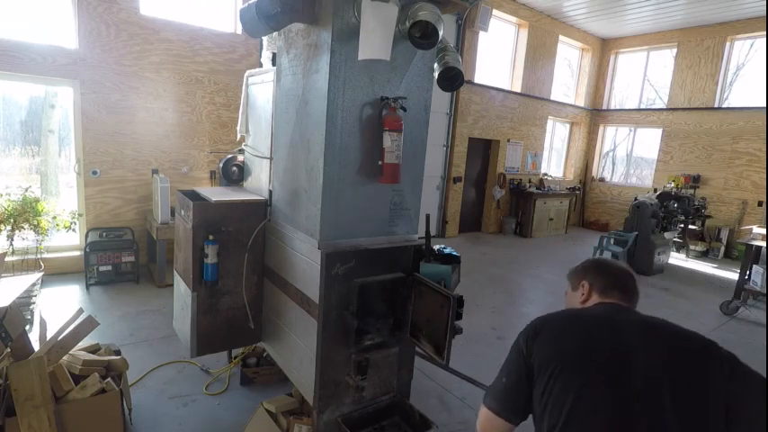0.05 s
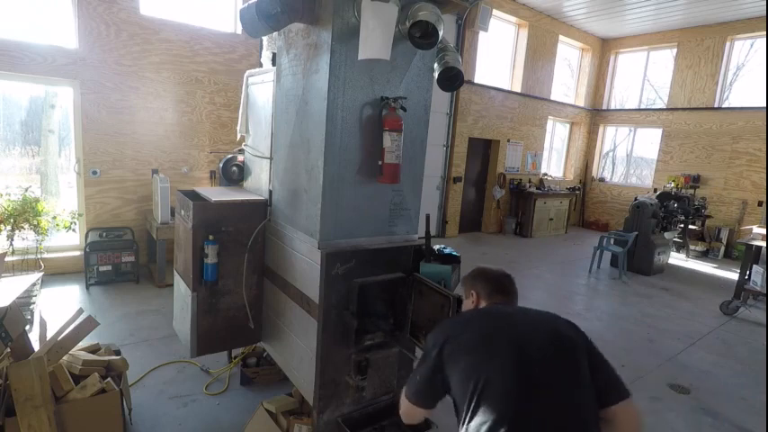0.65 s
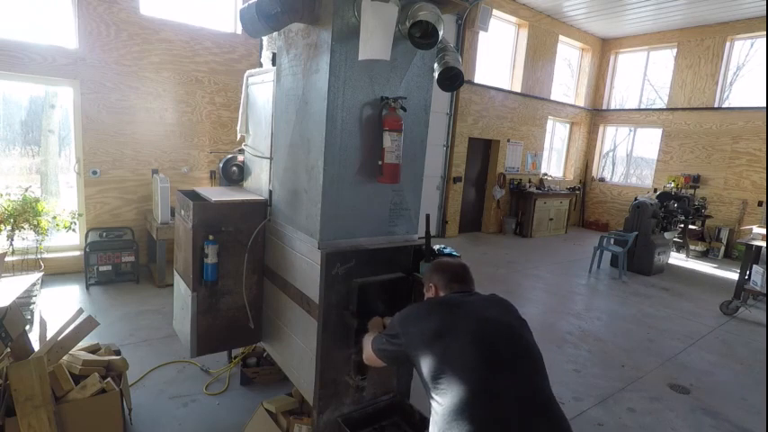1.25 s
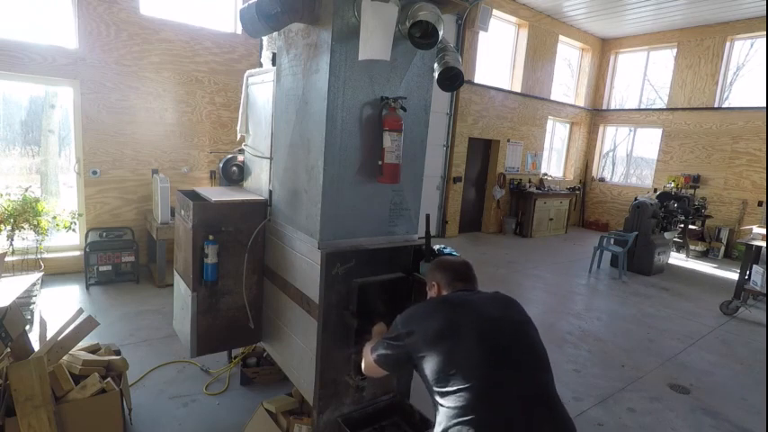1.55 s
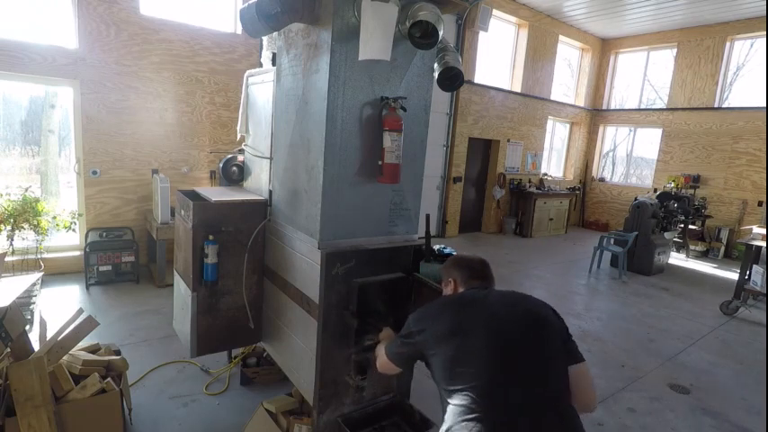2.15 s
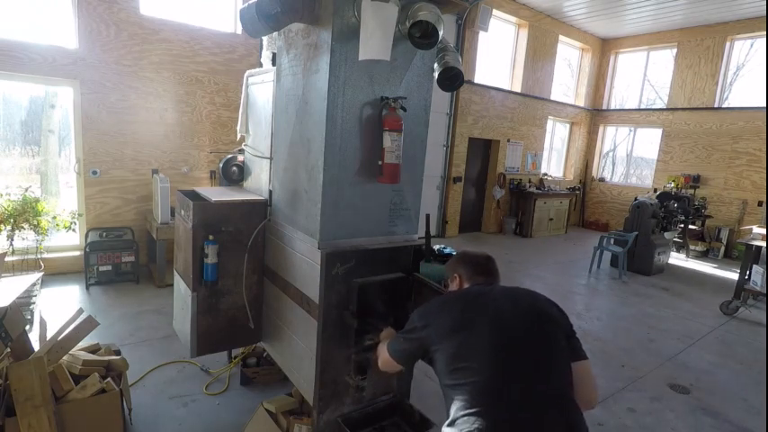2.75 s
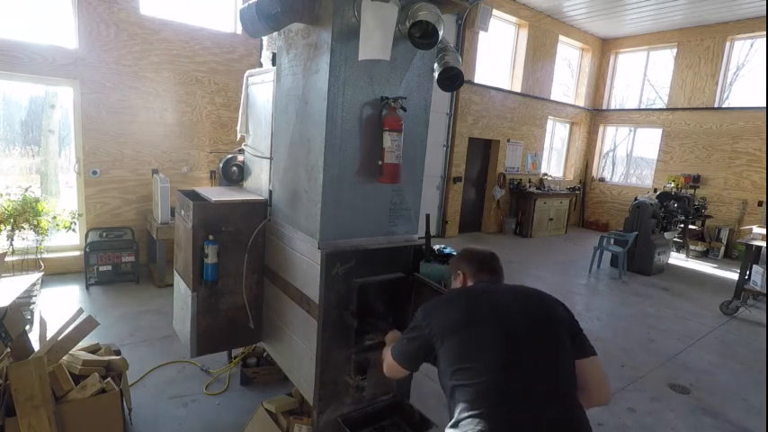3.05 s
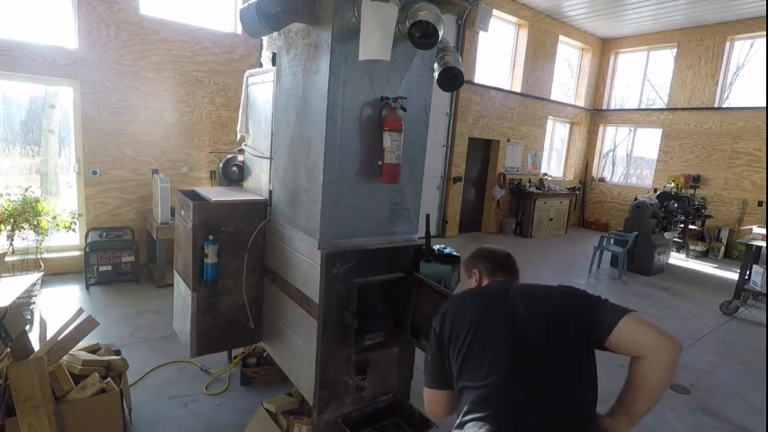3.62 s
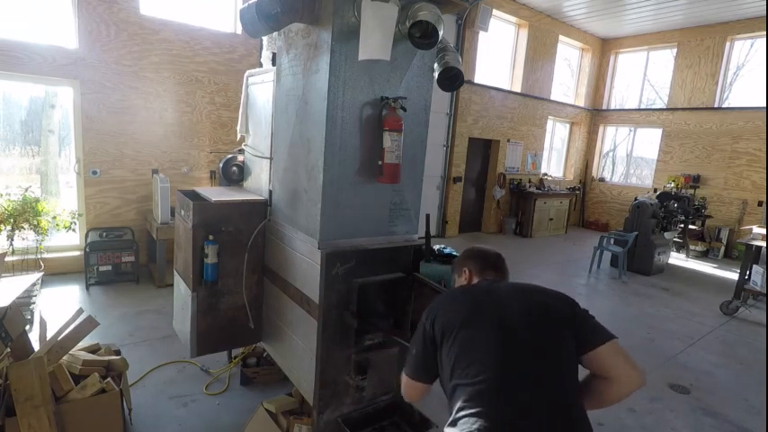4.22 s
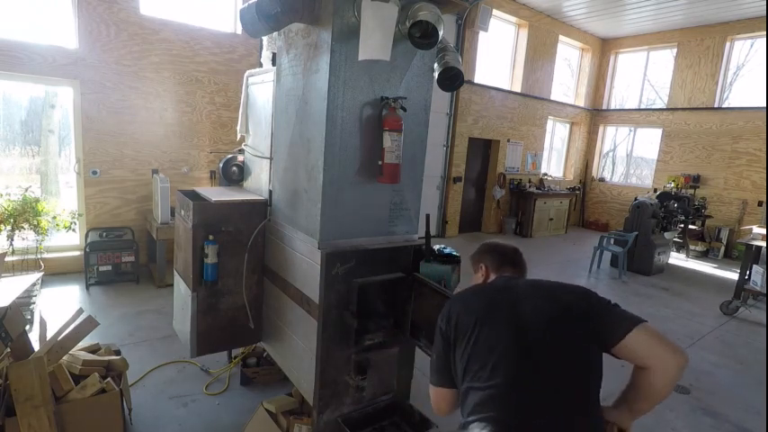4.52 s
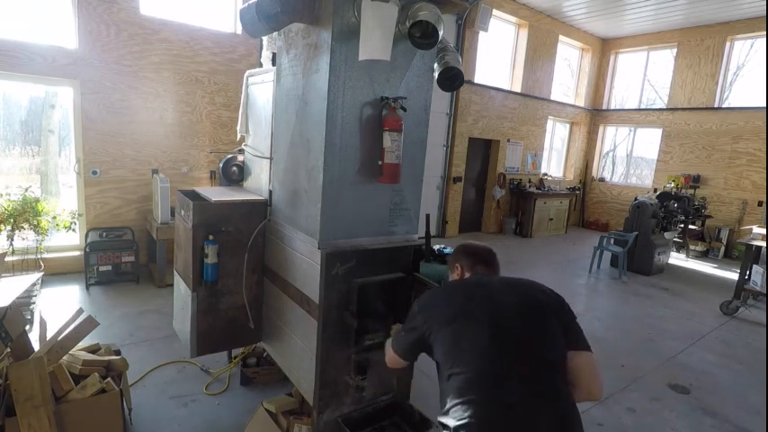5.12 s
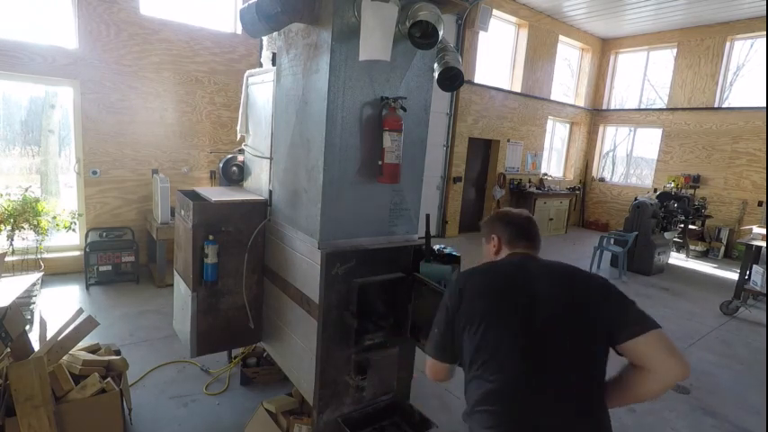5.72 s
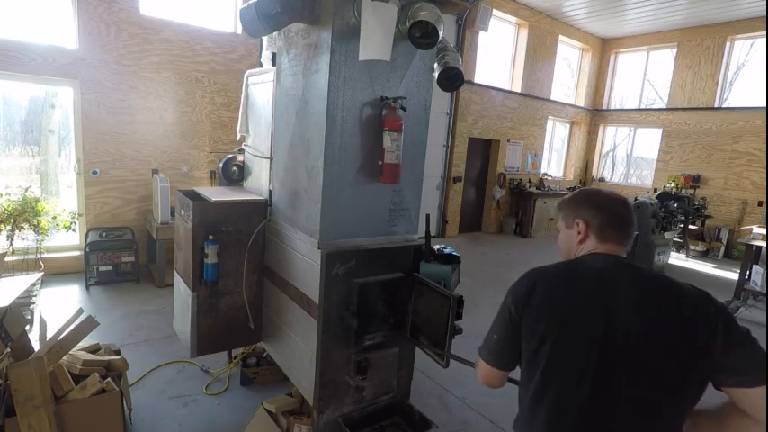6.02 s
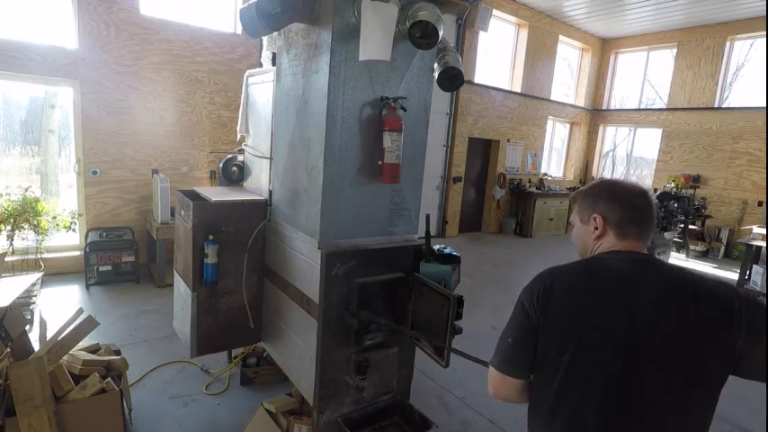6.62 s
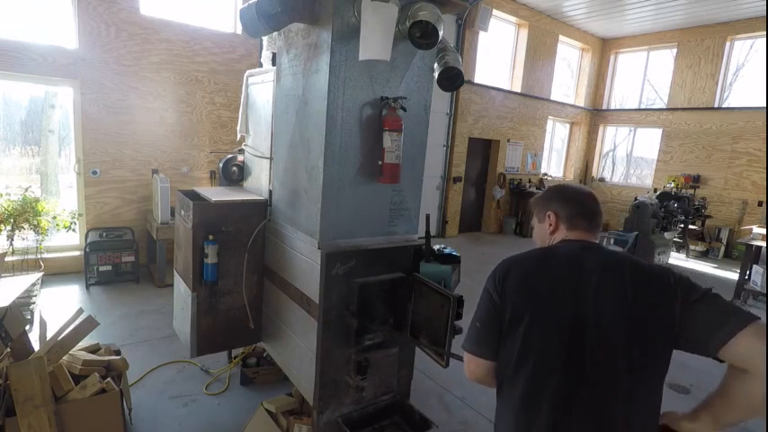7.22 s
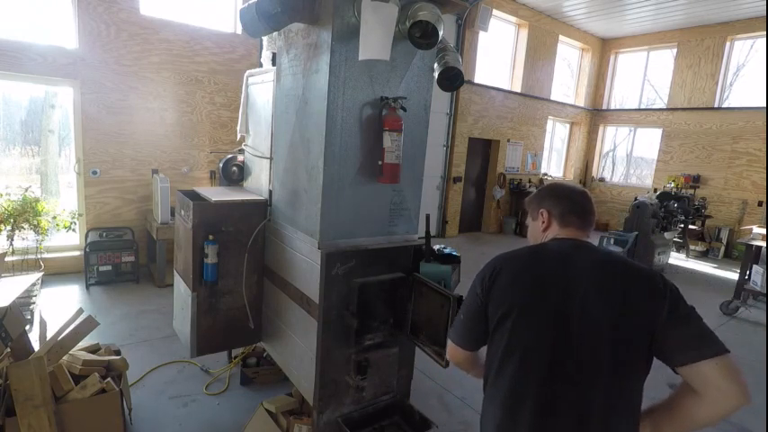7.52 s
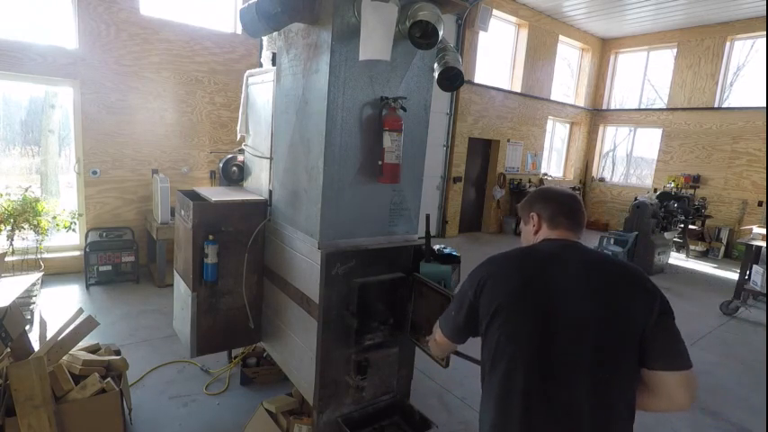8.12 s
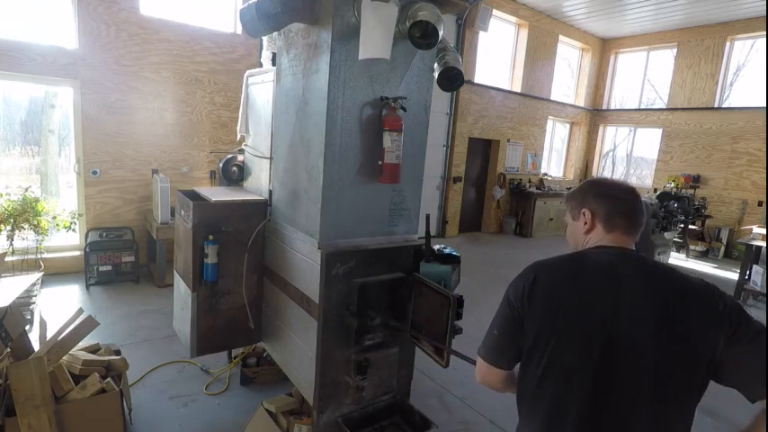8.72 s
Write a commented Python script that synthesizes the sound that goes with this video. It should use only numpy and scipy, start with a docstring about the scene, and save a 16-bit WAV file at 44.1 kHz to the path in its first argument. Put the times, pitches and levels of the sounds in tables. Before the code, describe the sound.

A long steel rod clinks on the door sill of a wood furnace, slides in and thuds against iron. It rakes the grate in separate gritty strokes, with hollow clangs and brief squeals, while ash sifts down. Near the end cinders crack and coals tumble into the pan among quick clinks, before one last knock and scrape. The microphone is near the furnace in an echoing workshop.

```python
"""A tall, echoing workshop, one microphone near a wood furnace being raked with a long steel rod.
The shaft clinks on the door sill and glides in with a hiss. From about a second in, the tip thuds on the
walls and rakes the grate: each stroke is a run of tiny slips that shakes the iron plates, sounds the
hollow firebox and makes the rod sing, surging where the tip catches. From three seconds on, loosened ash
sifts down. Around seven, cinders crack and coals tumble into the pan; a last thud and stroke follow."""
import sys
import numpy as np
from scipy import signal
from scipy.fft import rfft, irfft, next_fast_len
from scipy.io import wavfile
from scipy.ndimage import map_coordinates

SR = 44100
rng = np.random.default_rng(int(sys.argv[2]) if len(sys.argv) > 2 else 0)


def digitize_waveform(pressure):
    """Quantize a signal to 16-bit integers and store it at the path in sys.argv[1].

    Rows of a 2-D input are taken as channels; values are limited to [-1, 1].
    """
    field = np.atleast_2d(pressure).T
    bounded = np.clip(field, -1, 1)
    quanta = np.round(bounded * 32767).astype(np.int16)
    wavfile.write(sys.argv[1], SR, quanta)


N = 390726
TIME = np.arange(N) / SR
TOP_HZ = 15500  # upper limit of the microphone chain

# The hiss of crumbling ash and cinder. Each row: frequency in Hz, relative level in dB.
ASH_SPECTRUM = [(1000, -2), (4000, 10), (6000, 1), (10000, -2), (15000, -9)]


def scraping():
    """Dense slips, bunching as the tip catches on coals, drive the furnace; the shaft chatters coarsely."""
    catching = amp(1.28 * wobble(30) + 1.72 * wobble(120))
    slips = unit(catching * grains(rate=1800, spread_db=3))
    chatter = unit(catching * grains(rate=350, spread_db=3.5))
    on_plates, on_firebox, on_casing, on_rod, on_tip = stroke_forces()
    shaft = excite(on_rod * chatter, lambda: rod(contact_t60=0.19, vary_db=3), size=SR // 18)
    drives = [(on_plates, plates), (on_firebox, firebox), (on_casing, casing), (on_tip, bite)]
    furnace = sum(excite(force * slips, part, size=SR // 6) for force, part in drives)
    return furnace + shaft + grit(on_plates)


def stroke_forces():
    """How hard the arm's strokes drive the plates, the firebox, the casing, the rod and its caught tip."""
    # Strokes of the rod. Each row: start, rise and hold in seconds, force in dB, then the shares of
    # firebox, casing and shaft on the sill in dB relative to that force.
    strokes = [(0, .01, 0.11, -48.5, 0.5, -10, -2), (1.252, 0.019, 0.14, -38.5, 1.5, -21, -21.5),
               (1.397, 0.069, 0.48, -38, -1.5, -14.5, -7), (3.067, 0.145, 0.22, -28.5, -7.5, -18.5, -11.5),
               (4.063, 0.045, 0.092, -35.5, 3.5, -11, -17), (4.262, 0.026, 0.2, -27.5, -4.5, -12.5, -13.5),
               (5.194, 0.015, 0.032, -52.5, -15, -8, 1), (5.36, 0.199, 0.28, -34.5, -5, -13.5, -9.5),
               (6.66, 0.014, 0.097, -54.5, -15, -16, 8.5), (6.993, 0.096, 0.32, -45, -5.5, -10.5, -5),
               (8.131, 0.034, 0.12, -35, -4, -18, -7)]
    # The tip catches on a lump. Each row: time in seconds, surge in dB, half length in seconds.
    catches = [(0.114, 9.5, 0.023), (1.495, 3, 0.016), (1.646, 4, 0.017), (1.806, 7.5, 0.011),
               (1.837, 4.5, 0.012), (3.256, 4, 0.024), (4.208, 9, 0.011), (4.405, 1, .008),
               (4.453, 3.5, 0.018), (5.582, 12.5, 0.018), (5.692, 5.5, 0.0098), (5.719, 13, 0.01),
               (5.781, 10, 0.011), (5.823, 11.5, 0.012), (6.79, 20, 0.0097)]
    on_plates, on_firebox, on_casing, on_rod = np.zeros((4, N))
    for start, rise, hold, db, hollow_db, boom_db, sill_db in strokes:
        push = swell(start, rise, hold, fall=326)
        travel = np.clip((TIME - start) / (rise + hold), 0, 1) - .5
        on_plates += push * amp(db)
        on_firebox += push * amp(db + hollow_db)
        on_casing += push * amp(db + boom_db + 6 * travel)  # booms more as coals heap up at the tip
        on_rod += push * amp(db + sill_db - 2 * travel)  # eases a little along the stroke
    surge = amp(sum(db / (1 + ((TIME - s) / half) ** 2) for s, db, half in catches))
    plate_surge, bass_surge = surge ** 0.71, surge ** 0.14  # the furnace feels only part of a catch
    on_tip = amp(-3.5) * on_plates * (surge - 1)
    return on_plates * plate_surge, on_firebox * bass_surge, on_casing * bass_surge, on_rod * surge, on_tip


def knocking():
    """The tip lands twice and the casing booms as it settles; on the sill the shaft mostly rings itself."""
    # The tip strikes iron inside. Each row: time in seconds, relative strength in dB, then the shares
    # of firebox, casing, rod and grate in dB relative to that strength.
    thuds = [(1.214, -22.5, -2, -15, -43, -10.5), (2.952, -48.5, 2, 10.5, -6.5, -7.5),
             (3.424, -28.5, -8, -29, -5.5, -17), (3.941, -26.5, -27, -12.5, -8.5, -20),
             (4.012, -37, -6, -5, -14, -20), (4.053, -26.5, -10.5, -6.5, -14.5, -22),
             (4.177, -31, -6, -15, -16, -20), (5.305, -42.5, -19, -15, -3, -11),
             (5.402, -39.5, -3, -21, -9, -18), (8.104, -24.5, -6, -13.5, -1.5, -4.5)]
    # The shaft strikes the sill. Each row: time in seconds, relative strength in dB, longest ring that
    # the contact allows in seconds.
    clinks = [(0.001, -35, 0.14), (0.428, -47.5, 0.21), (0.476, -45, 3.2), (4.209, -37.5, 0.37),
              (5.783, -30, 0.1), (6.669, -40, 0.11), (6.698, -47, 0.057), (6.787, -38, 0.019),
              (6.841, -38, 0.08), (6.927, -51, 0.046), (7.044, -44.5, 0.037), (7.145, -41.5, 0.058),
              (7.223, -50, 0.044), (7.27, -48, 0.072), (7.349, -56, 0.048), (7.398, -46, 0.062),
              (7.522, -55.5, 0.14)]
    bounce_s, hand_t60 = 0.013, 0.049  # the hands damp the rod
    out = np.zeros(N)
    for s, db, hollow_db, boom_db, rod_db, grate_db in thuds:
        for delay, loss_db in [(0, 0), (bounce_s, -2)]:
            blow = plates() + amp(hollow_db) * firebox() + amp(rod_db) * rod(hand_t60)
            add(out, s + delay, amp(db + loss_db) * blow)
        add(out, s + bounce_s, amp(db + boom_db) * casing())
        add(out, s, amp(db + grate_db) * grate())
    for s, db, contact_t60 in clinks:
        add(out, s, amp(db) * rod(contact_t60, size=2 * SR // 3))
        add(out, s, amp(db - 10.5) * plates() + amp(db - 20.5) * firebox())  # passed on by the sill
    return np.sqrt(SR / 50) * out


def singing_metal():
    """Single wavering tones: the rod squeals, the iron groans, or the steel rings on after a clink."""
    # Tones of the metal. Each row: start and length in seconds, pitch and its waver in Hz, level in dB.
    tones = [(.002, 0.029, 4550, 22, -41.5), (.002, .02, 11650, 110, -56), (.01, 0.12, 850, 40, -48.5),
             (.002, .03, 2664, 14, -47), (0.475, .03, 2630, 6, -44), (0.493, 0.035, 6350, 62, -59),
             (.53, 0.6, 2643, 4.5, -73), (1.227, 0.14, 447, 19, -36), (1.463, 0.024, 8960, 40, -61),
             (1.548, 0.04, 8570, 46, -54.5), (1.66, .06, 8590, 63, -56), (1.58, 0.084, 490, 16, -31.5),
             (1.64, 0.027, 5100, 170, -42), (3.129, 0.31, 4610, 55, -51), (3.225, 0.071, 960, 166, -27.5),
             (4.097, 0.24, 650, 26, -32.5), (4.18, 0.069, 10210, 25, -63), (4.197, .18, 2645, 47, -42.5),
             (4.205, 0.018, 4590, 40, -40.5), (4.287, 0.018, 6400, 140, -45), (4.34, .025, 6580, 150, -48),
             (4.359, 0.21, 8480, 51, -62), (4.536, .03, 4060, 25, -45), (5.588, .015, 4090, 37, -39),
             (5.609, 0.073, 4630, 30, -43), (5.759, 0.061, 4640, 35, -42), (6.667, 0.029, 4100, 33, -49),
             (6.837, 0.011, 4120, 21, -40), (6.928, 0.008, 6550, 57, -52), (7.145, .02, 6500, 80, -47),
             (7.27, 0.017, 4580, 29, -45)]
    rise_s, fall_db_per_s, rough_db = 0.0046, 405, 3
    out, t = np.zeros(N), TIME[:SR // 2]
    for s, length, hz, waver_hz, db in tones:
        envelope = np.clip(t / rise_s, 0, 1) * amp(-fall_db_per_s * np.maximum(t - length, 0))
        pitch = hz + waver_hz * wobble(300, size=len(t))
        rough = unit(amp(rough_db * wobble(110, size=len(t))))
        add(out, s, amp(db) * envelope * rough * np.sin(2 * np.pi * np.cumsum(pitch) / SR))
    return out


def rod(contact_t60, size=SR // 4, vary_db=2):
    """The gritty tick of the contact, then the ring of the steel, longer when the rod bounces free."""
    # The tick's spectrum. Each row: frequency in Hz, relative level in dB.
    tick_spectrum = [(60, -25), (500, 2), (1800, 6.5), (3300, 2.5), (4700, 2.5), (6000, -5.5),
                     (7500, -14.5), (10000, -14.5), (15000, -22)]
    # The rod's bending modes. Each row: frequency in Hz, relative level in dB, free t60 in seconds.
    bending_modes = [(90.6, 2.5, 0.11), (1610, -3, 0.59), (1956, 0, 0.39), (2226, 7.5, 0.051),
                     (2616, 0.5, 0.79), (2610, -3, 0.97), (3090, -7, 0.33), (3587, -4, 0.6),
                     (4050, -2.5, 0.15), (4580, 0, 0.23), (4587, 3.5, 0.26), (4860, -4.5, 0.27),
                     (5108, -3, 0.18), (5540, -6, 0.167), (5680, -6, 0.06), (6340, -10, 0.16),
                     (6560, -10, 0.19), (6820, -10, 0.092), (8500, -6.5, 0.15), (8900, -10.5, 0.14),
                     (8930, -21, 0.12), (9300, -10.5, 0.13), (10150, -12.5, 0.11)]
    t = np.arange(size) / SR
    tick_shape = amp(-60 * t / 0.17) * (1 - np.exp(-t / 0.00023))
    tick = unit(noise(tick_spectrum, size)) * tick_shape
    overtones = [(hz, -19, .025) for hz in rng.uniform(7200, 14500, size=6)]  # new at every contact
    return unit_energy(amp(4.5) * tick + ring(bending_modes + overtones, size, contact_t60, vary_db))


def plates(size=SR // 4):
    """Ash-damped iron plates: a dense clang with a few clearer modes."""
    # The clang's spectrum. Each row: frequency in Hz, relative level in dB.
    spectrum = [(50, -51), (130, -15.5), (250, -11.5), (500, -2), (900, 2), (1400, 0.5), (2300, -9),
                (3000, -18.5), (5000, -25.5), (6500, -34.5), (10000, -39.5), (15000, -51)]
    # Its decay. Each row: frequency in Hz, t60 in seconds.
    decay = [(300, 0.25), (1500, 0.16), (5000, 0.33), (9000, 0.19)]
    # The clearer modes. Each row: frequency in Hz, relative level in dB, t60 in seconds.
    iron_modes = [(645.2, -2, 0.34), (795.5, -5.5, 0.23), (855, -7, 0.14), (1045, 2.5, 0.12),
                  (1140, -10, 0.051), (1183, -11, 0.09), (1540, 3, 0.079)]
    return diffuse(spectrum, decay, size) + amp(-12) * unit_energy(ring(iron_modes, size))


def firebox(size=SR // 4):
    """The air in the fire chamber sounds hollow: a short, dense boom and a few distinct resonances."""
    # The dense boom. Each row: frequency in Hz, relative level in dB.
    spectrum = [(150, -33), (310, -9), (400, -5), (500, -6), (600, -1.5), (1200, -7.5), (4000, -78)]
    # Air resonances. Each row: frequency in Hz, relative level in dB, t60 in seconds.
    air_modes = [(318.4, -6, 0.24), (367, -5.5, 0.32), (391.3, -4, 0.54), (456, -6.5, 0.074),
                 (492.3, 1.5, 0.26), (511, 4, 0.12)]
    boom = diffuse(spectrum, decay=[(300, 0.42), (700, 0.69)], size=size)
    return unit_energy(boom + amp(-0.5) * unit_energy(ring(air_modes, size)))


def casing(size=SR // 4):
    """The sheet-metal housing booms in its low modes."""
    # Modes of the housing. Each row: frequency in Hz, relative level in dB, t60 in seconds.
    sheet_modes = [(89.4, -14, 0.52), (122, -14, 0.14), (142.3, -8.5, 0.48), (162, 0, 0.27),
                   (189.9, 3, 0.26), (215.8, -6.5, 0.5), (252.4, -4.5, 0.43), (282.2, -0.5, 0.37)]
    return unit_energy(ring(sheet_modes, size))


def grate(size=SR):
    """After a hard blow the heavy grate drones low and long."""
    # Clusters of close modes. Each row: frequency in Hz, relative level in dB.
    spectrum = [(60, -30), (90, -4), (120, -20), (165, -12), (192, -0.5), (225, -17), (290, -4), (340, -6),
                (390, 7), (435, -5), (495, -1), (540, -15), (900, -24), (2500, -55)]
    # Their decay. Each row: frequency in Hz, t60 in seconds.
    decay = [(90, 0.51), (390, 1.6), (1000, 0.76)]
    return diffuse(spectrum, decay, size)


def bite(size=SR // 10):
    """A caught steel tip digs into the iron with a short, harsh rasp."""
    # The rasp's spectrum. Each row: frequency in Hz, relative level in dB.
    spectrum = [(300, -28), (900, -5), (1500, 2.5), (2300, -1.5), (3100, -11), (5000, -23), (6500, -31),
                (15000, -42)]
    return burst(spectrum, t60=0.053, size=size)


def grit(force):
    """Coarse crumbs burst one by one under the moving tip."""
    crumbs = amp(-32) * force * unit(grains(rate=70, spread_db=4))
    return excite(crumbs, lambda: burst(ASH_SPECTRUM, t60=.015, size=SR // 50), size=SR // 12)


def through_door(x):
    """The furnace mouth shades the treble: more gets out while the tip is near the open door."""
    # Openness of the path to the microphone. Each row: time in seconds, gain on the treble band in dB.
    openness = [(0, 2), (.6, 5), (1.2, -0.5), (3.2, -5), (4.5, -3.5), (5.8, -5.5), (6.5, 5.5), (6.66, 1.5),
                (7.5, 6.5), (8.1, -3), (8.86, -7)]
    treble = coloured(x, [(3500, -27), (5500, -3.0), (9000, 3.0)])
    gain = amp(np.interp(TIME, *np.transpose(openness)))
    return x + (gain - 1) * treble


def cinders():
    """Single cinders drop or crack, each with a crumbling snap and a brief tinkle."""
    # Cinders. Each row: time in seconds, relative level in dB, pitch in Hz, the crack's extra treble in dB.
    drops = [(.429, -41, 8550, 12), (.566, -52, 4130, 12), (.678, -48, 8960, 0), (.83, -40, 5100, -9),
             (1.304, -37, 4870, 3), (3.662, -34.5, 5050, 10), (3.723, -45, 3790, 12),
             (4.46, -24.5, 5240, -2), (5.826, -32, 9900, -2), (6.1793, -42, 13500, 6),
             (6.245, -45, 4460, -2), (6.2935, -47, 9990, 4), (6.313, -44, 6890, 0), (6.672, -22.5, 6890, 6),
             (6.731, -39, 11710, 12), (6.77, -24, 4820, 4), (6.832, -35, 6554, 1), (6.911, -49, 13440, 22),
             (6.928, -29.5, 6550, -7), (7, -34, 10330, 3), (7.146, -30, 4480, 9), (7.196, -36, 12750, 14),
             (7.221, -24.5, 4500, 20), (7.242, -37, 5860, 0), (7.272, -28, 4430, 8),
             (7.298, -42, 14810, 16), (7.35, -33, 5510, 7), (7.5592, -37.5, 5150, 10),
             (7.604, -46, 9300, 8), (7.7093, -41, 3810, -2), (8.526, -39, 5170, 0), (8.719, -35.5, 5510, 4)]
    # A cinder's modes. Each row: multiple of its pitch, relative level in dB, t60 in seconds.
    cinder_modes = [(1, 0, .022), (1.04, -2, .016), (.94, -4, .014), (1.42, -7, .016), (1.95, -10, .014)]
    out, t = np.zeros(N), TIME[:SR // 10]
    crack_shape = amp(-60 * t / .04) * (1 - np.exp(-t / .0012))
    for s, db, hz, treble_db in drops:
        crack = coloured(noise(ASH_SPECTRUM, len(t)), [(5000, 0), (13000, treble_db)])
        modes = [(hz * ratio, level, t60) for ratio, level, t60 in cinder_modes if hz * ratio < TOP_HZ]
        add(out, s, amp(db - 12) * (ring(modes, len(t)) + crack_shape * unit(crack)))
    return out


def ash():
    """Ash sifts down in clumps: flakes that each tinkle at their own pitch, over a hiss of dust."""
    # Falls of ash. Each row: start, rise and hold in seconds, level in dB, fade in dB a second.
    falls = [(3.2, 0.17, .02, -51, 77), (5.6, 0.35, 0.093, -54, 50), (6.984, 0.18, 0.058, -48, 80),
             (8.121, 0.071, 0.23, -54, 22)]
    flake_count, flake_t60, dust_db = 6000, .006, 2.5
    t = TIME[:SR // 80]
    when, pitch, size = rng.random((flake_count, 3)).T[:, :, None]
    hz = 1500 + pitch * (TOP_HZ - 1500)
    tinkles = amp(12 * size) * amp(-60 * t / flake_t60) * np.sin(2 * np.pi * hz * t)
    positions = (when * N).astype(int) + np.arange(len(t))
    flakes = np.bincount(positions.ravel(), tinkles.ravel(), N)[:N]  # sum the tinkles into one track
    dust = amp(dust_db) * rng.standard_normal(N)
    clumps = amp(2 * wobble(70))
    return flow(falls) * unit(coloured((unit(flakes) + dust) * clumps, ASH_SPECTRUM))


def coals():
    """Soft lumps raked over the edge rumble in the ash pan."""
    # Tumbles of coal. Each row: start, rise and hold in seconds, level in dB, fade in dB a second.
    tumbles = [(6.758, 0.05, 0.05, -59, 130), (7.037, 0.18, 0.23, -53, 51)]
    # The pan's dull rumble. Each row: frequency in Hz, relative level in dB.
    pan_spectrum = [(40, -5), (65, -15), (90, 5.5), (130, -0.5), (250, -8), (600, -36)]
    return flow(tumbles) * unit(coloured(grains(rate=130, spread_db=1.0), pan_spectrum))


def sliding():
    """Unloaded, the shaft glides in over the ashy sill with a soft, slightly uneven hiss."""
    # The hiss. Each row: frequency in Hz, relative level in dB.
    spectrum = [(1500, -18), (4000, -4), (5600, 3), (7500, -6), (9200, -3.5), (12000, -14), (15000, -14)]
    level = amp(-66.5 - 2 * wobble(30)) * swell(start=0.7, rise=0.04, hold=0.23, fall=150)
    return level * unit(noise(spectrum))


def hall(size=3 * SR // 2):
    """The bare workshop answers with a tail that builds over a few milliseconds and dulls as it dies."""
    # Strength of the echo. Each row: frequency in Hz, relative level in dB.
    spectrum = [(100, 8), (1000, 0), (4800, 1.5), (7000, 3), (14000, 7)]
    # Reverberation time. Each row: frequency in Hz, t60 in seconds.
    decay = [(100, 1.57), (500, 2.25), (1200, 2.28), (2500, 2.23), (4800, 1.29), (7000, 0.71),
             (12000, 0.62)]
    return diffuse(spectrum, decay, size) * (1 - np.exp(-TIME[:size] / 0.0012))


def room_tone():
    """The quiet, steady rumble of the workshop's air."""
    # The rumble. Each row: frequency in Hz, relative level in dB.
    spectrum = [(12, 0), (20, 9), (169, -7), (235, -6.5), (387, -8.5), (555, -15), (713, -9), (796, -25),
                (1110, -16.5), (1640, -19), (3270, -22), (4950, -26), (15000, -32.5)]
    return amp(-62.5) * unit(noise(spectrum))


def ring(modes, size, contact_t60=9, vary_db=2):
    """Damped sines; their strength and pitch shift with the point of contact, which also damps them."""
    t = np.arange(size, dtype=np.float32) / SR
    hz, db, t60 = np.transpose(modes)[:, :, None]
    strength = rng.choice([-1, 1], len(hz)) * amp(db[:, 0] + vary_db * rng.standard_normal(len(hz)))
    cycles = np.float32(hz * (1 + 0.002 * rng.standard_normal(hz.shape))) * t
    damping = np.float32(np.log(1000) * (1 / t60 + 1 / max(contact_t60, .02)))
    onset = cycles / (1 + cycles)  # each mode takes a cycle or so to get going
    return strength @ (onset * np.exp(-np.minimum(damping * t, 20)) * np.sin(2 * np.pi * cycles))


def diffuse(spectrum, decay, size):
    """Countless overlapping modes: noise in which each frequency dies at its own speed."""
    hz, t, bands = signal.stft(noise(spectrum, size), SR, nperseg=256)
    fading = np.exp(-np.log(1000) * t / along(decay, hz)[:, None])
    rise = 1 - np.exp(-TIME[:size] / 0.0011)  # vibration takes a moment to spread
    return unit_energy(rise * signal.istft(bands * fading, SR, nperseg=256)[1][:size])


def burst(spectrum, t60, size):
    """A puff of noise that falls by 60 dB in t60 seconds."""
    return unit_energy(noise(spectrum, size) * amp(-60 * TIME[:size] / t60))


def excite(force, response, size):
    """Play a force through a response that is drawn anew every size samples, as the rod travels."""
    out = np.zeros(N)
    for start in range(0, N, size):
        piece = force[start:start + size]
        if piece.any():
            add(out, start / SR, signal.fftconvolve(piece, response()))
    return out


def swell(start, rise, hold, fall):
    """A gain that builds up, holds at 1, then drops by fall dB a second."""
    rise_db, touch_s = 10.5, 0.011
    t = TIME - start
    db = -rise_db * np.clip(1 - t / rise, 0, 1) - fall * np.maximum(t - rise - hold, 0)
    return np.clip(t / touch_s, 0, 1) * amp(db) * (db > -60)


def flow(falls):
    """The gain of falling material: one swell for each fall."""
    return sum(amp(db) * swell(start, rise, hold, fall) for start, rise, hold, db, fall in falls)


def grains(rate, spread_db):
    """Impulses at random times, about rate a second, with log-normal sizes."""
    return (rng.random(N) < rate / SR) * rng.choice([-1, 1], N) * amp(spread_db * rng.standard_normal(N))


def wobble(rate, size=N):
    """A smooth random curve with rate knots a second."""
    return map_coordinates(rng.standard_normal(int(size * rate / SR) + 4), [TIME[:size] * rate])


def noise(spectrum, size=N):
    """Noise with a spectrum of (Hz, dB) points."""
    return coloured(rng.standard_normal(size), spectrum)


def coloured(x, spectrum):
    """Filter x by a curve of (Hz, dB) points."""
    m = next_fast_len(len(x) + 8192)
    return irfft(rfft(x, m) * amp(along(spectrum, np.fft.rfftfreq(m, 1 / SR))), m)[:len(x)]


def along(points, hz):
    """Read (Hz, value) points on a log frequency axis."""
    knots_hz, values = np.transpose(points)
    return np.interp(np.log(hz + 1), np.log(knots_hz), values)


def add(track, s, sound):
    """Mix a sound into a track at s seconds."""
    start = int(np.clip(round(s * SR), 0, N - 1))
    track[start:start + len(sound)] += sound[:N - start]


def amp(db):
    """Decibels to gain."""
    return 10 ** (np.asarray(db) / 20)


def unit(x):
    """Scale to rms 1."""
    return x / np.sqrt(np.mean(x ** 2) + 1e-20)


def unit_energy(x):
    """Scale to energy 1."""
    return x / np.sqrt(np.sum(x ** 2) + 1e-20)


def scene():
    """Rod and furnace in front, the hall's echo and room tone behind; both channels alike."""
    raking = through_door(scraping() + knocking()) + singing_metal()
    direct = raking + ash() + sliding() + cinders() + coals()
    mono = direct + room_tone() + amp(-5.5) * excite(direct, hall, size=SR // 2)
    return np.array([mono, mono])


def record(dry):
    """The microphone chain passes nothing above its band limit."""
    m = next_fast_len(N + 8192)
    return irfft(rfft(dry, m) * (np.fft.rfftfreq(m, 1 / SR) < TOP_HZ), m)[:, :N]


dry = scene()
out = record(dry)
digitize_waveform(out)
```